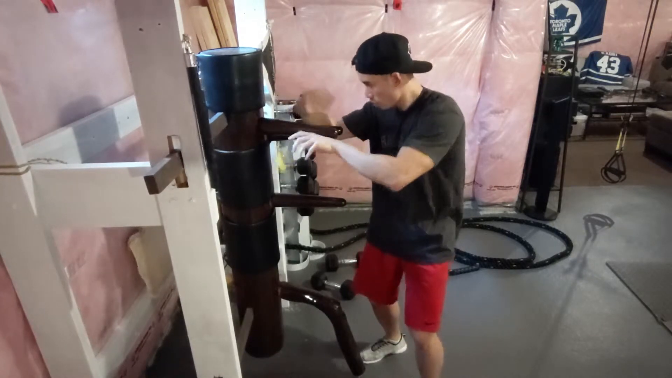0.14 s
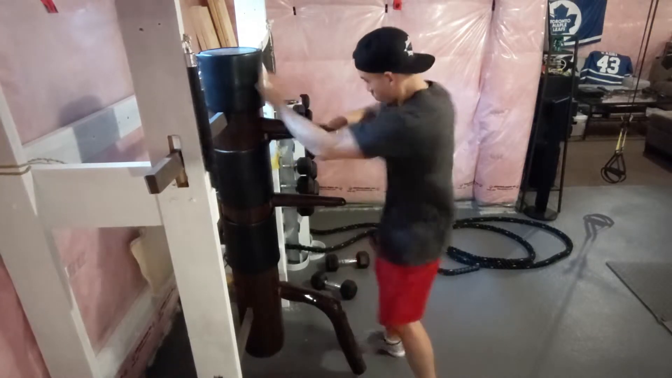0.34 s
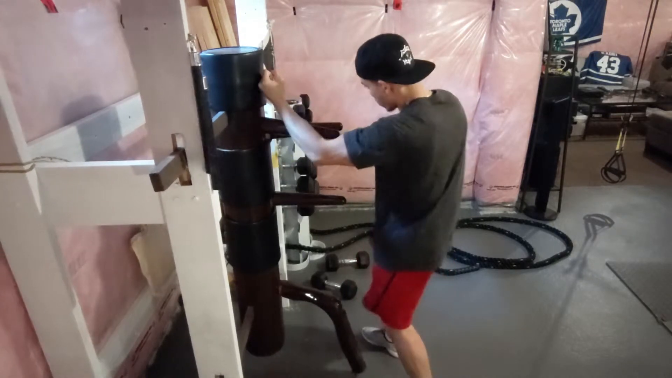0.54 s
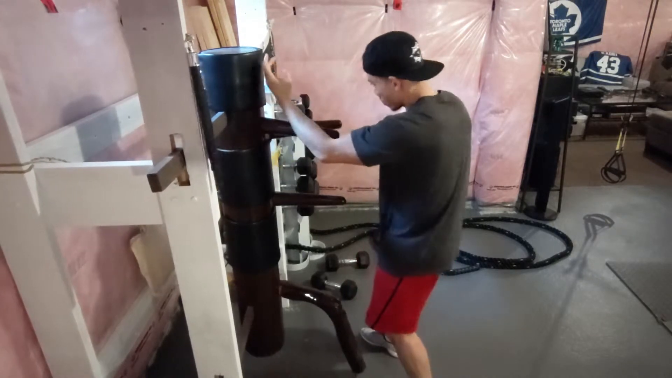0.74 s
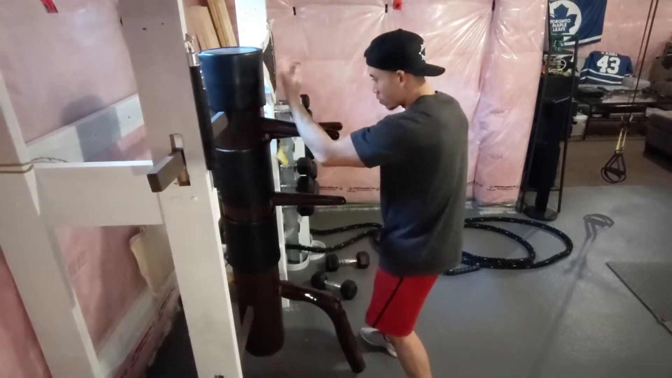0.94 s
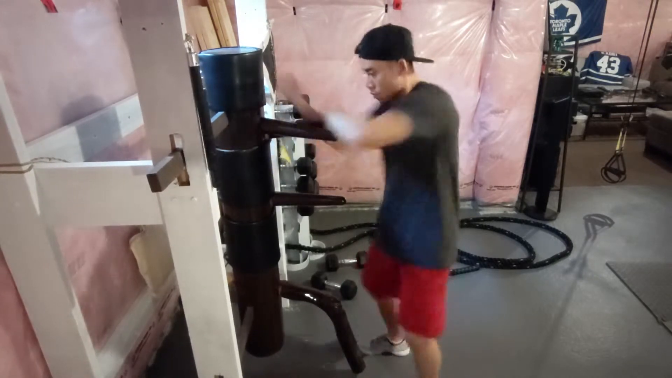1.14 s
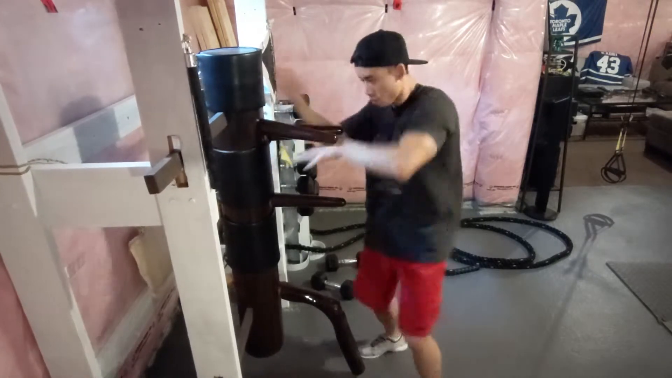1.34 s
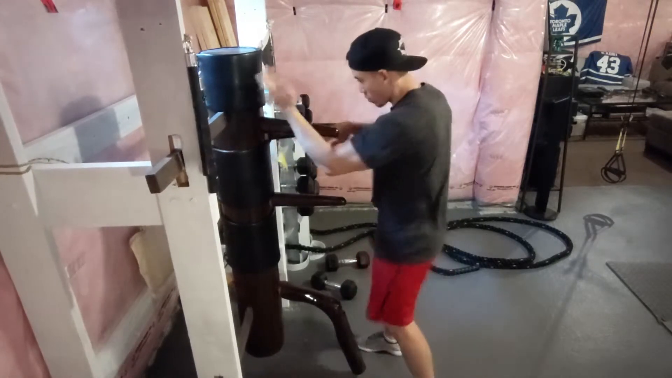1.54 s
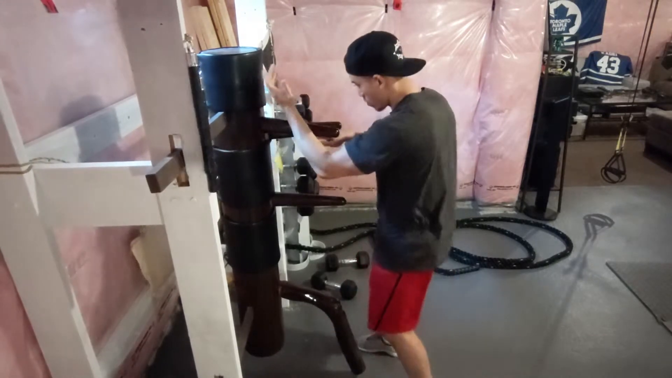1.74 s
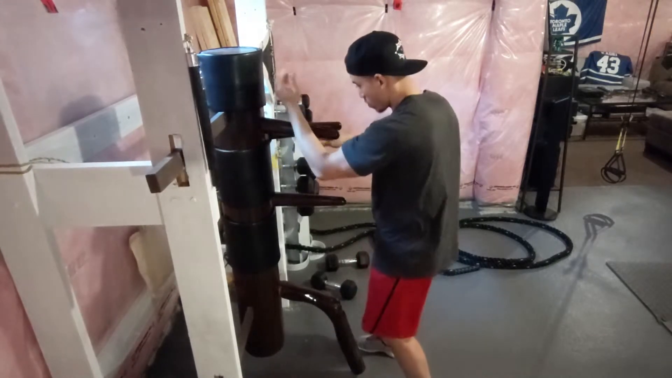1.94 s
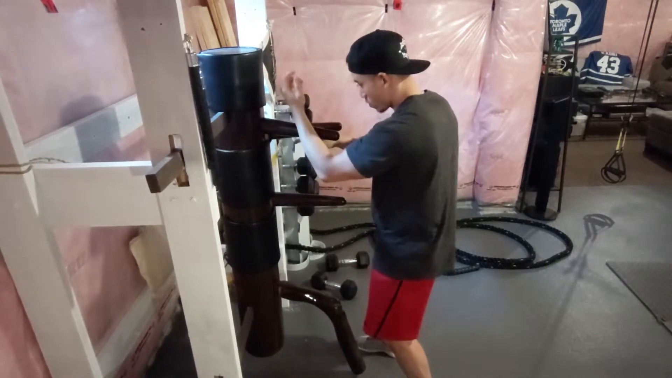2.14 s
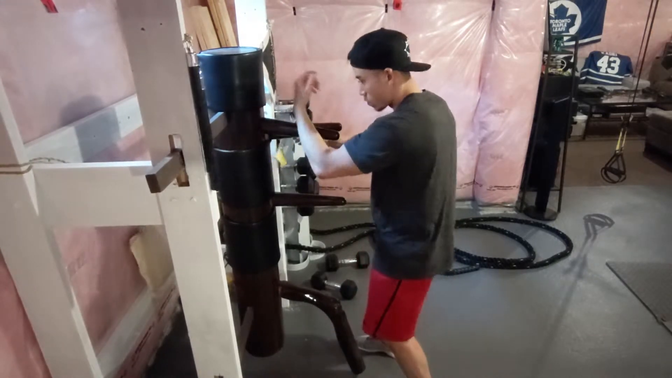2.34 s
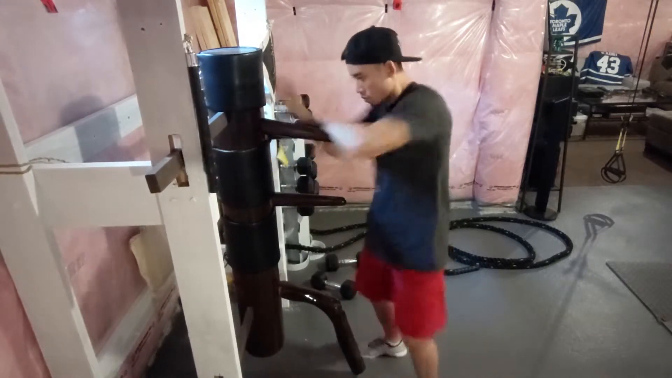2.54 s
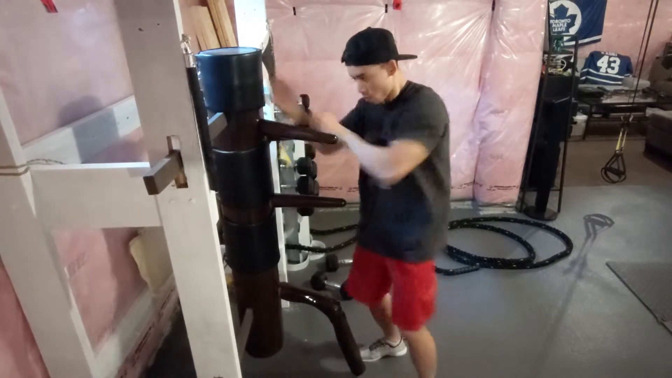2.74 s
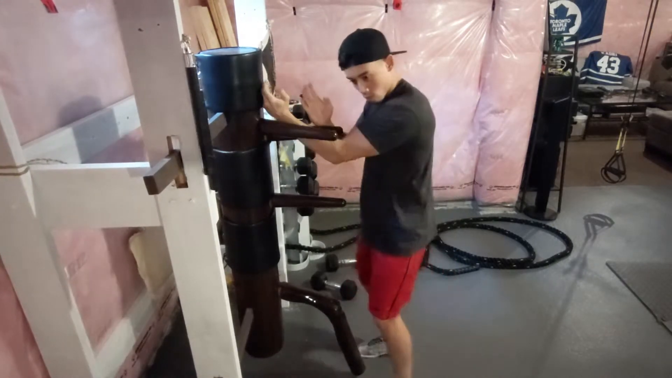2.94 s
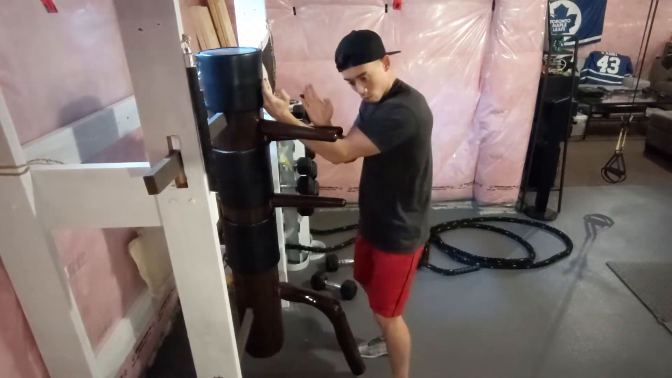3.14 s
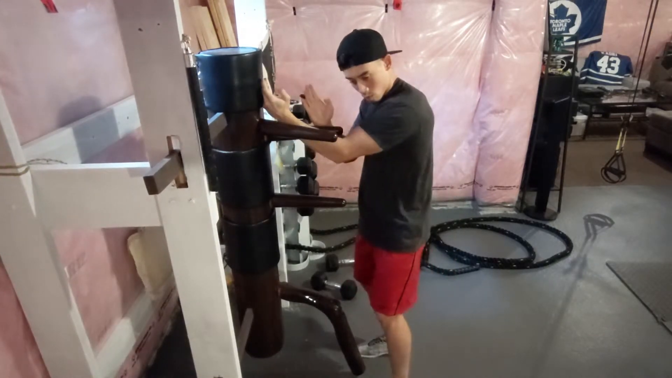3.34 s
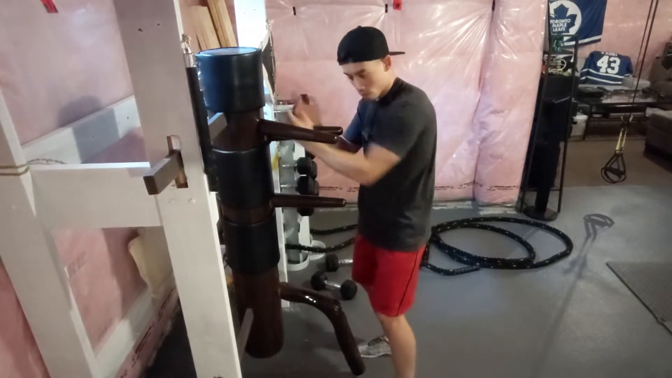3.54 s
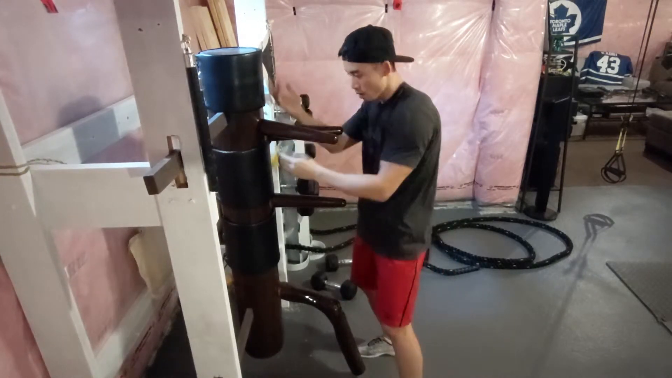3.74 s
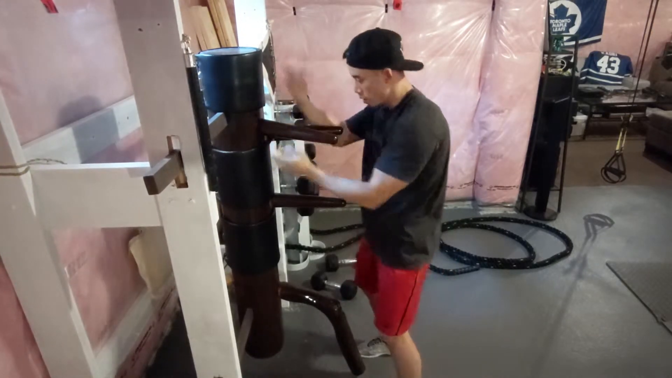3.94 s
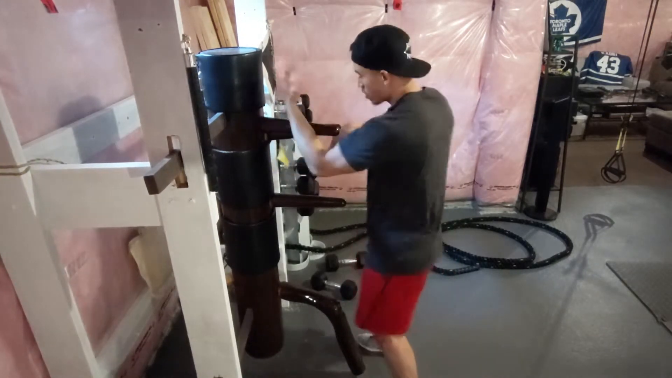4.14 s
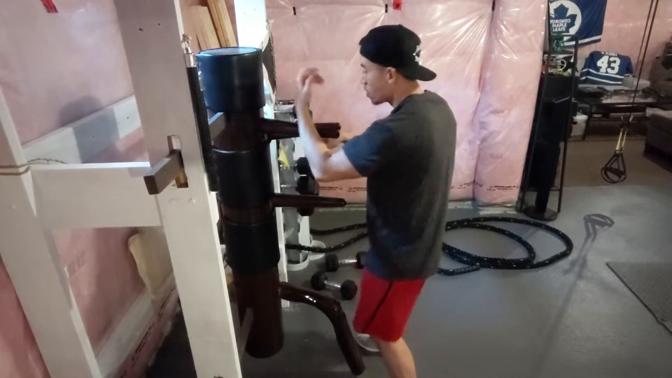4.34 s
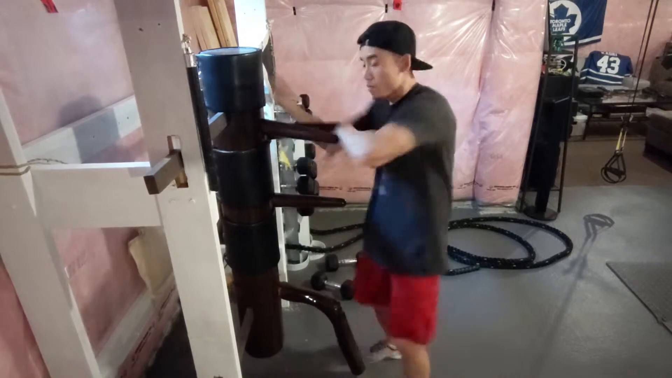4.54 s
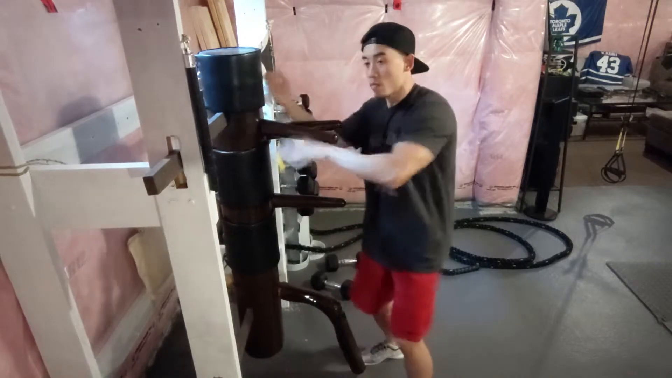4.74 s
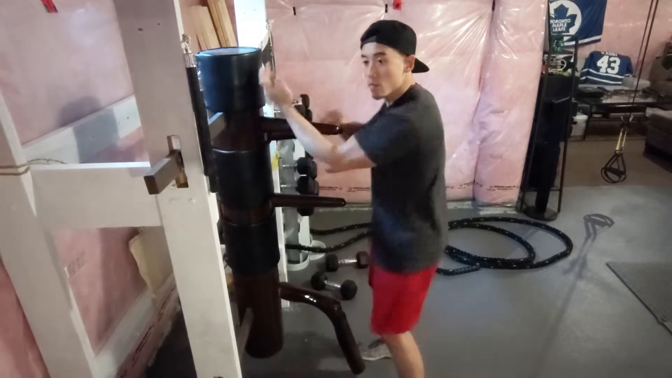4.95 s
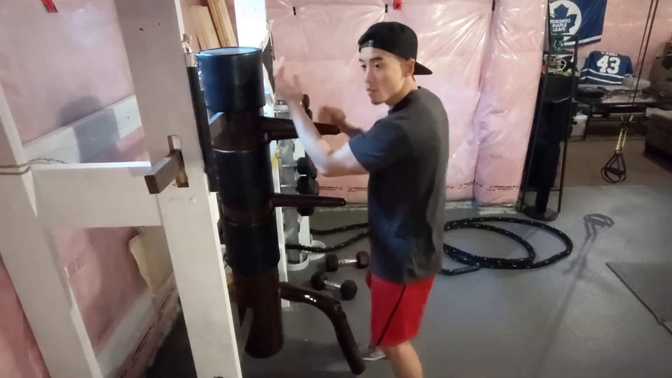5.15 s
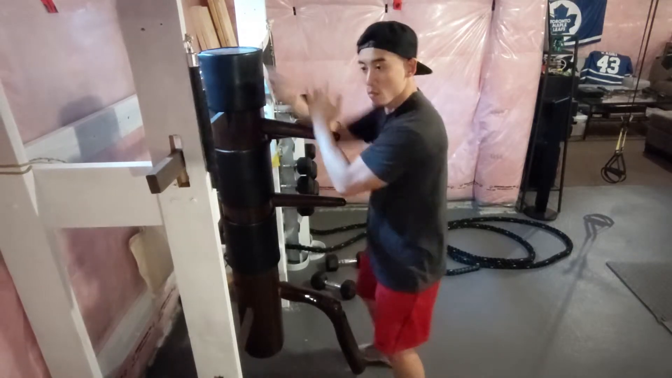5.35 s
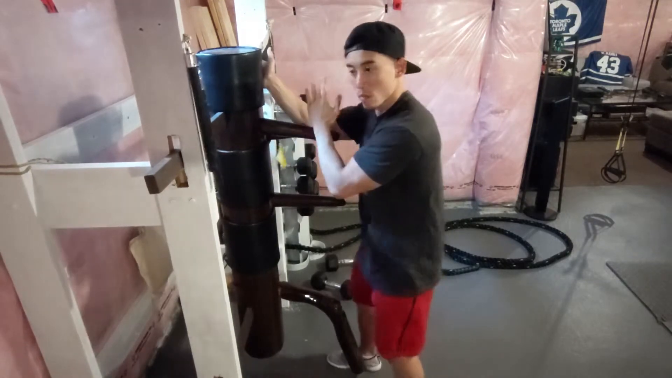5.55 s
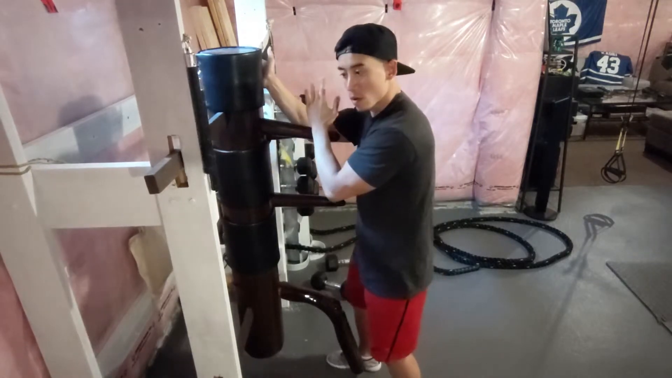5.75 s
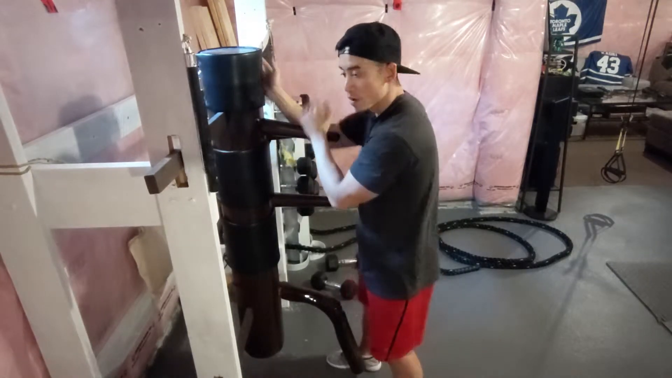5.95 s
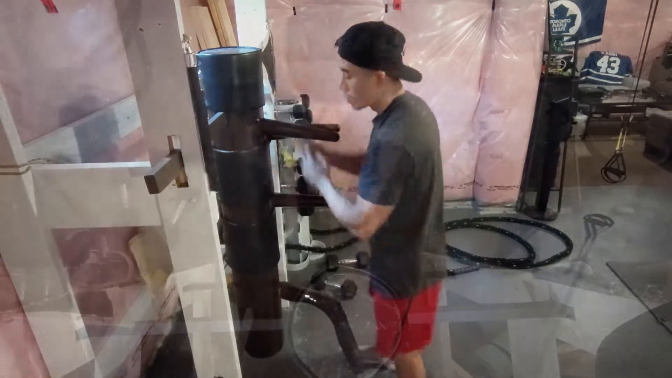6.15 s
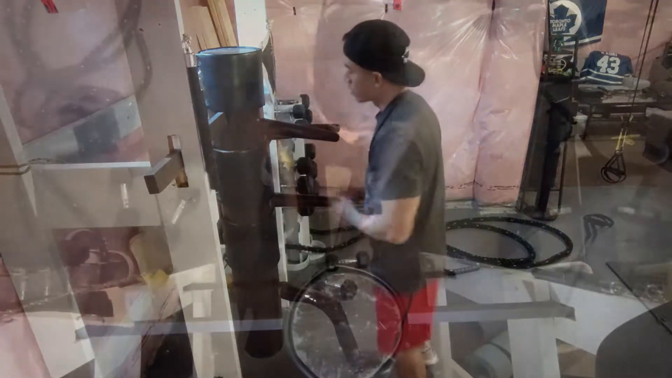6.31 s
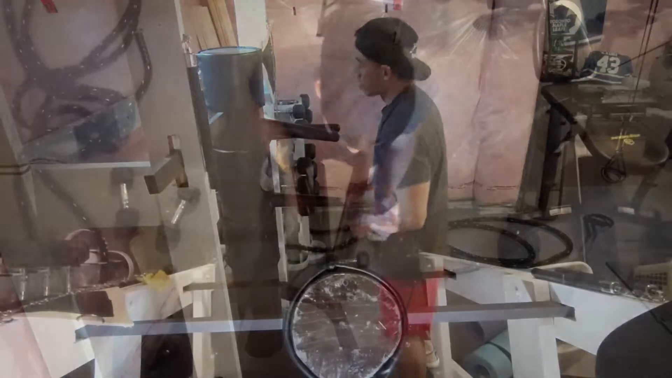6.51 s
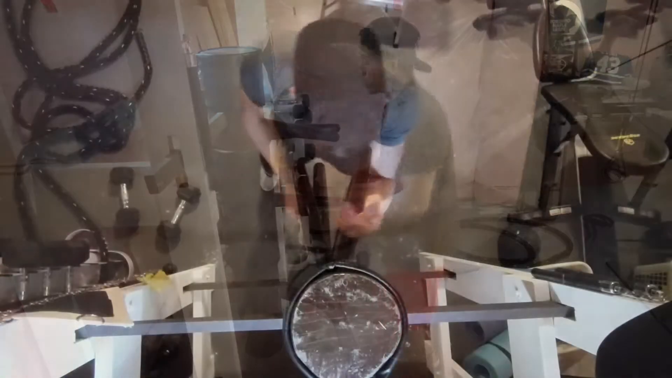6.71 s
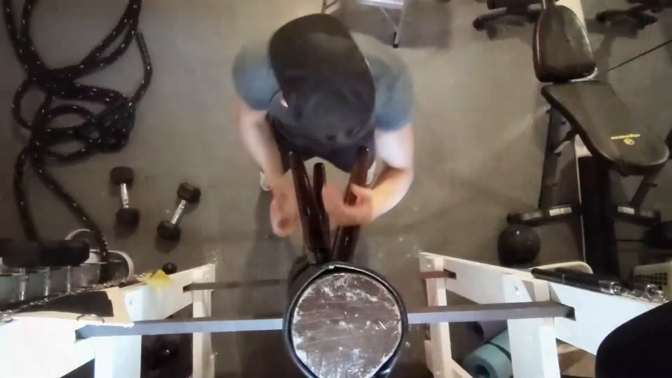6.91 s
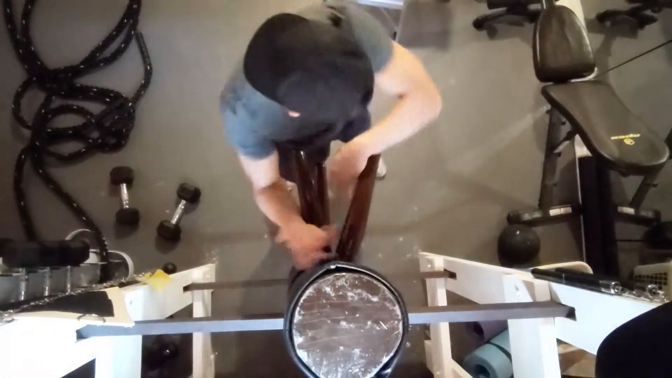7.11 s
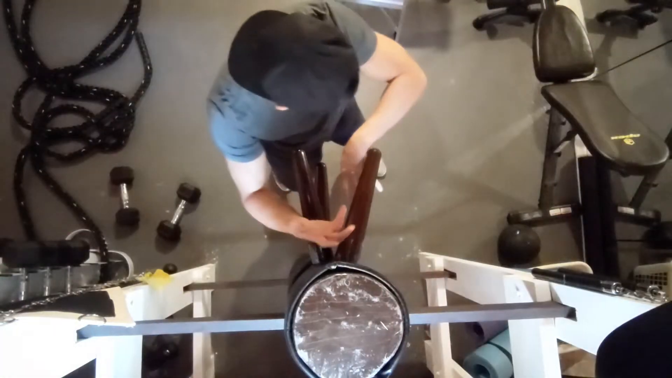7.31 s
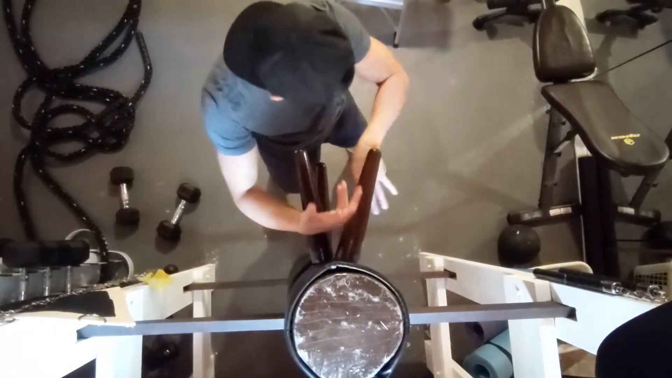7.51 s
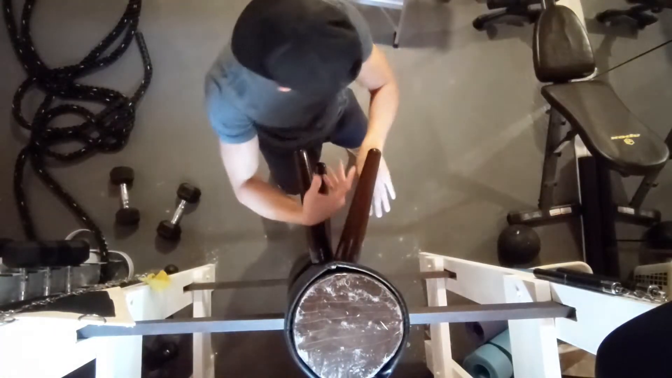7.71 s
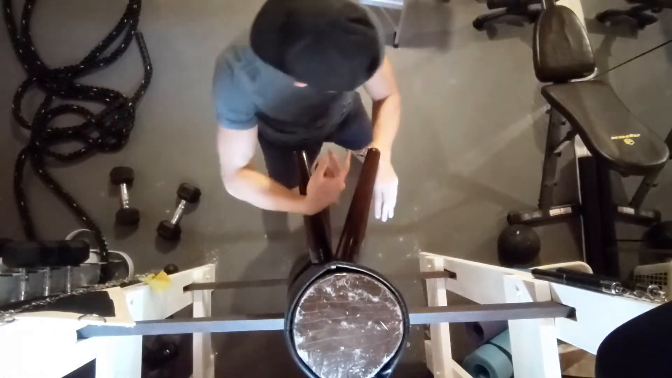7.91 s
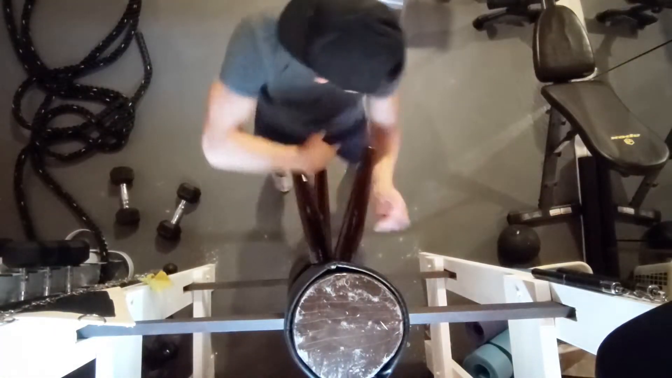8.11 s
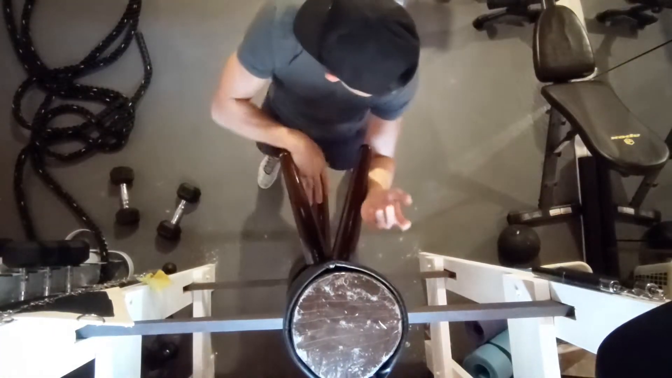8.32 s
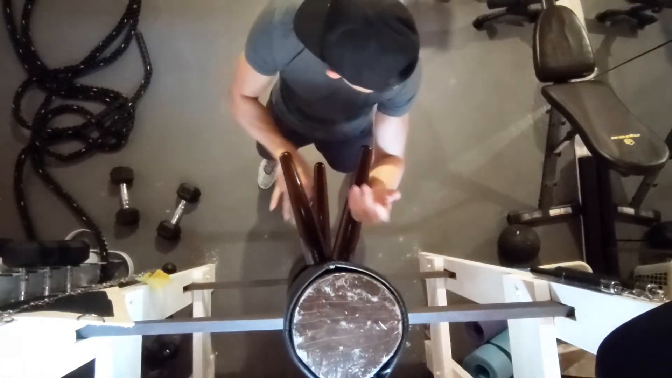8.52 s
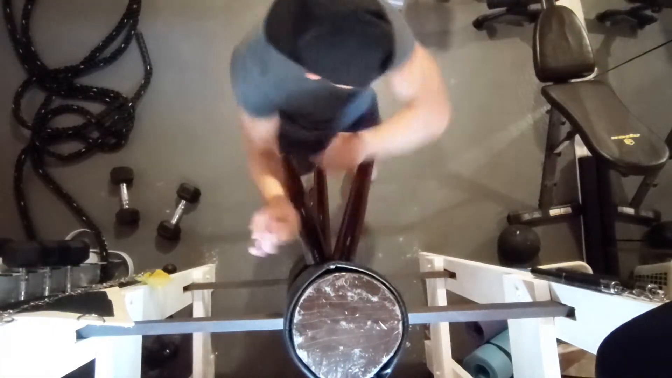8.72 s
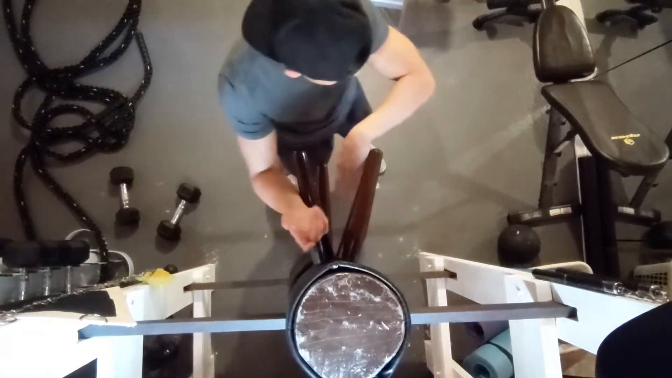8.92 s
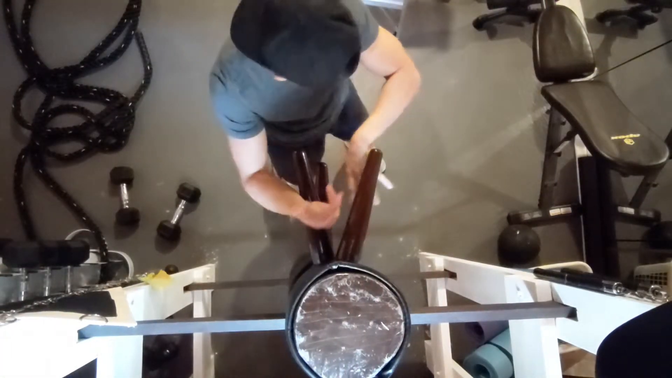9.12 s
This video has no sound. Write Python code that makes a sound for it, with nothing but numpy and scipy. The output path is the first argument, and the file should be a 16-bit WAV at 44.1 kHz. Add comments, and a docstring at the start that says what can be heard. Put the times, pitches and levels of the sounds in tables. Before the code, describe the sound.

Rapid wood knocks and slaps on a training dummy come in flurries, with low trunk thumps, skin slides and faint shoe scuffs in a padded basement.

```python
"""A padded basement gym, small and dry, heard a few metres from its walls through two microphone ports.
Forearms and palms strike a wooden training dummy: contact noise and ringing modes make its loose arms knock
and rattle in their sockets, and low modes thud in trunk and frame. Skin slides on wood and shoes scuff the
floor as coloured noise, over floor rumble and room tone. From 6.6 s the microphone hears from overhead."""
import sys
import numpy as np
from scipy import signal
from scipy.fft import rfft, irfft, next_fast_len
from scipy.io import wavfile
from scipy.ndimage import uniform_filter1d, map_coordinates

SR = 44100
rng = np.random.default_rng(int(sys.argv[2]) if len(sys.argv) > 2 else 0)


def int16_out(signal):
    """Quantize to a 16-bit WAV file."""
    q = np.round(np.clip(np.atleast_2d(signal).T, -1, 1) * 32767)
    wavfile.write(sys.argv[1], SR, q.astype(np.int16))


N = 404397

# Floor rumble, the floor shaken by the dummy's frame, swelling after blows: [t/s, level/dB]
RUMBLE = [(0.0, -49), (0.43, -65.5), (0.69, -43.5), (1.1, -60), (1.71, -42.5), (1.94, -59.5), (2.6, -70.5),
          (2.93, -41), (3.29, -69), (4.98, -50.5), (5.21, -58.5), (5.49, -59.5), (5.67, -42.5), (6.51, -74),
          (7.35, -58), (7.84, -68.5), (8.89, -64.5), (9.17, -47)]
# Room tone, with a dip near 6.8 s: [t/s, level/dB]
ROOM_TONE = [(0, -66.5), (6.4, -64), (6.8, -74.5), (9.17, -66.5)]
# Colour of the room tone: [f/Hz, relative level/dB]
AIR_COLOUR = [(59, -33), (100, -2.5), (761, -20.5), (942, -17.5), (1790, -23), (2260, -23.5), (2460, -25),
              (3400, -24), (7330, -30), (14200, -30.5), (16500, -41)]
# Likeness of the two ports: [f/Hz, left-right correlation]
PORT_LIKENESS = [(60, .99), (180, .94), (500, .72), (1500, .5), (4000, .25), (15000, .2)]
# Decay of the room: [f/Hz, t60/s]
ROOM_DECAY = [(100, 0.74), (300, 0.35), (800, 0.24), (2000, 0.26), (5000, 0.32), (13000, 0.25)]
# Microphone position: [t/s, delay of the left port behind the right/samples]
PORT_LAG = [(0, 4), (6.4, 1), (6.7, -2), (9.17, -2.4)]
# Blows on the dummy: [t/s, strength/dB, hardness/dB, place toward the arm tip/dB, slowest arm bend/dB,
# trunk level/dB, frame level/dB, left over right/dB]
KNOCKS = [(0.38, -40.5, -8, -10, 6, -47.5, -62, 2), (0.416, -19, -1.5, 1.8, -8.5, -36, -50.9, 1.1),
          (0.505, -13.5, 3, -2.5, -4, -32.5, -35.5, 1), (0.513, -30.5, 9, -3.5, -5, -31.5, -35, -1.3),
          (0.539, -14.5, 10.5, 3.3, -13, -26, -30, 1), (0.556, -20, 11.5, 0, 5, -38, -36, -0.5),
          (0.664, -25.5, 3.5, -0.5, 5.5, -46.5, -54, 0.2),
          (0.809, -30.5, -0.8, 1.7, -0.5, -40, -51.4, -0.9), (0.821, -37, -8, 8.5, -6, -40, -60.7, 1.05),
          (0.866, -55, 16.5, 3.2, 7, -59, -64.5, 1), (1.247, -30, -6.5, 2, 4, -51.5, -59, -1.2),
          (1.293, -23.5, 1.5, -0.04, -2, -37, -49, -0.5), (1.308, -15.5, 14.5, 1.05, -4, -38, -51.2, -1.3),
          (1.322, -19, 6, 7.5, -17, -36, -44, 1.5), (1.335, -15.5, -3.5, -5, -23, -35.5, -50.2, -0.3),
          (1.445, -25.5, -1.5, 2.16, -3, -38.5, -59.7, 0.7), (1.46, -13.5, -4, 6, 1.5, -37.5, -58.2, -0.2),
          (1.487, -24, -10.5, 5.1, -22, -50, -39, 0.7), (1.635, -14, 9.5, -5.85, -1, -34.5, -49.5, 0.65),
          (1.795, -37, 8, 1, 6, -49, -51.5, -2), (1.884, -43.5, 12, 2.5, 3, -52.5, -50, -0.7),
          (2.11, -30, -9, -5, -2.5, -45, -58.5, 0.6), (2.121, -43.5, 1.2, 2.5, -6, -50.5, -60.5, 0.6),
          (2.601, -45.5, -4.5, 4, 8, -51.1, -62.8, 0.5), (2.633, -26.5, 8.5, -1.5, -1.4, -45, -60, 1),
          (2.643, -27, 1.4, 4, -3, -44, -58, -1.1), (2.679, -21.5, 6.5, 2.3, -2, -39, -53, 0.2),
          (2.695, -17, -2.5, 2.5, 5, -38.5, -51, 1.5), (2.717, -9.5, 7, 1.46, -13, -44, -41, 0.6),
          (2.871, -20, -10.5, -9, 0.5, -44, -39.8, -0.2), (2.899, -41, -1.5, 14, -1, -55.9, -57, 1.1),
          (2.973, -43, 6.5, 6.5, 2, -41, -57, 1), (3.333, -58.5, 16.5, 0.5, -2, -73, -72.0, 0.4),
          (3.635, -54, 0.5, -10, 9, -47, -56.5, 0), (3.847, -66, 21.5, -2, -7.5, -73.5, -74, 1.0),
          (3.987, -50.5, -5.5, -6, 7, -57.6, -64.5, 0), (4.184, -71, 4.5, -0.5, 9, -57.5, -54.5, -5.5),
          (4.217, -51, 9.5, 7, -11.0, -43.5, -54.5, -0.5), (4.239, -22.5, 4, -5.5, 3, -29.5, -53, 0.75),
          (4.251, -17.5, 4.5, 3.5, 6, -25.5, -50.4, -0.6), (4.283, -36, 4, -9.8, 6, -34, -61.7, 3),
          (4.453, -58.5, 9.5, 0, -11, -60, -56, 0.3), (4.521, -24, -8, -3.5, -5, -42.4, -57, 0.1),
          (4.552, -15.5, -10.5, 1.5, -1.5, -58.2, -63, 0.85), (4.559, -17, -15.5, 14.5, -6, -61, -60, -2),
          (4.662, -34.5, 1.3, -6, -0.6, -47.5, -49, 2.5), (4.681, -23, 5, 4.5, -6, -38, -43.2, 0.5),
          (4.692, -25.5, 4.5, -2.6, 6, -34.5, -41, -1.6), (4.716, -17, 12, 3.5, -5, -34.5, -42, -0.5),
          (4.724, -13, 0.1, -3, -22, -32.5, -46, 1.9), (4.738, -16.5, 4.5, 4.5, -3.5, -43, -40, 1.5),
          (4.874, -38.5, -2.5, -3.5, 6.5, -41, -59.4, 1.4), (4.954, -22, 3.5, 0, 0.5, -51, -53, 0),
          (4.969, -15, -5.5, 3.5, -3, -32, -63.3, 0.4), (5.028, -13.5, -5, -2.5, -8, -30.5, -66.2, -0.0),
          (5.049, -26, 3.5, 1.5, 3, -44, -50.9, 3), (5.075, -33.5, 9, 2.4, -12, -52, -49, -0.35),
          (5.191, -43, 10, 3.5, 6, -57, -65, -1.5), (5.349, -60, 14.5, 2, 1, -61, -71.4, 1),
          (5.428, -42.5, -4.5, -1, 6, -40.5, -57, 0.7), (5.439, -25, -7, -7.5, -2, -37, -57, 1),
          (5.457, -23.5, -2.3, -3.5, -0.5, -40, -54, 1), (5.527, -33.5, 6, -5, -3.3, -53, -46, 0.5),
          (5.552, -26.5, -2.9, 2, 5.5, -26, -40, 2.5), (5.569, -28.5, 14, -5, -2.8, -22, -32.5, 0),
          (5.59, -38.5, 11.5, 5, 5.7, -29.5, -35, -0.64), (5.62, -41.5, 6, 5, -1, -43.9, -49.1, 1),
          (5.672, -33, -7, -1.5, 2.5, -61, -49, 3), (5.847, -56.5, 12.5, -4.5, 5.5, -57.5, -56, 1.6),
          (6.329, -56.5, -3, 1, -0.5, -78, -66, 1.4), (6.433, -60, 12.5, -8, 1, -76, -72.8, 0),
          (6.834, -32, -15, -1.5, 2, -48, -60.5, 2.5), (6.869, -33.5, -14, 1, 7, -51, -58.5, 1.5),
          (7.024, -40.5, -16.5, -4, 7.5, -57, -68, 1.9), (7.053, -51, -23, -16, 4, -69, -71.1, 7),
          (7.163, -47, -8, -6, 10, -48, -60, 1.2), (7.203, -22.5, 0.5, 4, 5.5, -32, -55, -3.1),
          (7.207, -18.5, 1.6, -1, 6.5, -33.5, -60, 2.3), (7.27, -24.5, -9.0, -4, 6, -47, -57, 4.5),
          (7.282, -26.5, -12.6, -7, -4, -47.9, -41.5, 0), (7.545, -29.5, -17, -6, 5, -47, -74, 4.5),
          (7.552, -27, -22, -4, 5, -51, -64, -0.5), (8.211, -58.1, -11, -1.5, 7.5, -63, -72.5, 4),
          (8.254, -26.5, -9, 1, 10.5, -52.5, -70.6, 1.5), (8.288, -22.5, -13.5, 2.5, 7.5, -44, -56, 1.5),
          (8.305, -34, 6, 8, 1.5, -37, -52.5, 0.5), (8.321, -28.5, -7.5, 4.0, 5.8, -36.5, -55.5, 7.5),
          (8.344, -29, 6, 6, 0, -49.5, -53, 0), (8.365, -24.5, -3.1, -4, 5, -47, -54.5, 1.5),
          (8.39, -37, -1, -7, -1, -51, -56.1, -6), (8.578, -46, 4, 0.5, -3, -63, -78.5, 1.4),
          (8.587, -55, -9, -4.5, -8, -56.5, -80, 12), (8.752, -54, 3, -3.5, 9.5, -63.5, -83.5, 1.7),
          (8.809, -44, -10, -5.5, 11, -40, -61.8, 1.9), (8.834, -15.5, -14.5, -1.5, 4.5, -47, -64, 1.8),
          (8.914, -12.5, 0, -3, -1.3, -34, -46, 2), (8.924, -12.5, -1.5, 8.5, -1, -32, -36, 0.8)]
# Colour of a clack: [f/Hz, level/dB, then dB per dB of hardness, of place toward the tip, of slow bend,
# of trunk over strength, and last the change from overhead/dB]
CLACK_COLOUR = [(370, -14.5, 0.4, -0.39, 0.37, 0.16, -7.5), (650, -7, 0, 0.1, 1.2, 0, 0.5),
                (854, -3, 0.5, -0.76, 0, 0, -0.5), (1706, -4, 0.41, 0.84, 0.026, 0, 0),
                (2620, -10.5, 0.71, 0.41, 0, 0, -1.5), (4556, -15.5, 1.13, 0.29, 0.073, 0, -0.5),
                (9900, -23, 1.46, -0.25, 0.067, 0, 0.5)]
# Peaks and valleys that the arm's bending modes leave in the contact noise: [f/Hz, level/dB]
BENDING_GRAIN = [(900, 2.5), (1250, 0.5), (1700, 1.03), (2080, -3), (2550, 6), (3000, 1), (3800, 2.5)]
# Modes of the hardwood arms: [f/Hz, level/dB, t60/s]
ARM_MODES = [(358.5, 4, 0.059), (602.7, -12.5, 0.22), (747, -1.5, 0.033), (869, 5, 0.02), (1130, -5, 0.023),
             (1390, -5.5, 0.045), (1599, -3.5, 0.053), (1711, -7, 0.084), (2415, 2.5, 0.016),
             (2705, -8, 0.028), (3190, -8, 0.043), (3740, -7, 0.046), (4300, -24.5, 0.022),
             (5100, -13, 0.028), (5640, -8, 0.087), (7030, -15, 0.12), (7480, -9, 0.12)]
# Modes of the trunk: [f/Hz, level/dB, t60/s]
TRUNK_MODES = [(108.5, -8.5, .3), (142.16, -4.5, 0.37), (155.5, -1.2, 0.4), (196.6, -4, 0.34),
               (239.7, -5.5, 0.2)]
# Modes of the frame and the slats that carry the trunk: [f/Hz, level/dB, t60/s]
FRAME_MODES = [(27, -9.5, 0.53), (34, -13, .3), (40.56, -7, 0.32), (48.12, -3.5, 0.83), (56.5, -4, 0.15),
               (66, -2.5, 0.12), (77.9, -5, 0.74), (99, -4, 0.25)]
# Forearms sliding along the wood: [t/s of the blow, level/dB]
SLIDES = [(0.539, -45), (1.245, -63.5), (1.305, -38.5), (2.719, -39.5), (4.244, -53.5), (4.52, -59),
          (4.685, -49), (5.57, -35), (7.204, -47), (8.299, -49), (8.913, -41.5)]
# Shoes and shirt in motion: [t/s of the loudest moment, level/dB, rise over 20 dB/s, fade by 20 dB/s]
SCUFFS = [(3.04, -47, .09, .12), (3.135, -51, .09, .1), (3.89, -60, .1, .13), (4.04, -63, .1, .1),
          (5.82, -62, .15, .2), (6.05, -68, .12, .12), (6.23, -62, .13, .1), (6.37, -63, .04, .1),
          (6.445, -60, .09, .13), (6.635, -65, .05, .06)]
# Colour of soles and cloth: [f/Hz, relative level/dB]
SOLE_COLOUR = [(150, -49.5), (250, -11.5), (775, -11.5), (971, -12.5), (1530, -4.5), (1850, -13),
               (2050, -9.5), (5730, -12), (16000, -27.5)]

TOP_HZ = 16300  # upper limit of the microphone's band
SPAN, LEAD = 2 ** 15, 1024  # samples in one knock with its room tail, and those ahead of its onset
OVERHEAD_S = 6.6  # from here on the microphone looks down on the dummy
USUAL_THUD_DB = -14.5  # usual trunk level over strength
CHATTER_S = .0025  # decay constant of the contact
RING_DB, RING_PER_HARD = -1, -.3  # free ring (dB); a hard slap damps the arm (dB per dB)
FRAME_TILT_DB = 6.5  # dB per octave about 50 Hz: from overhead the frame sounds higher
BUILD_UP_S, LET_GO_S = 0.029, 0.042  # time constants of a slide before and after its blow
LEFT_RIGHT = np.array([[1], [-1]])  # opposite signs for the two ports


def amp(db):
    """Gain of a level in dB."""
    return 10 ** (np.asarray(db) / 20)


def unit(x):
    """x at rms 1."""
    return x / np.sqrt(np.mean(x ** 2) + 1e-20)


def along(points, hz):
    """(Hz, value) points read on a log frequency axis."""
    f, v = np.transpose(points)
    return np.interp(np.log(hz + 1), np.log(f + 1), v)


def curve(rows, count):
    """Column number count of a time table, one value per sample."""
    columns = np.transpose(rows)
    return np.interp(np.arange(N) / SR, columns[0], columns[count])


def wobble(rate):
    """A smooth random curve with rate knots a second."""
    knots = rng.standard_normal(int(N * rate / SR) + 4)
    return map_coordinates(knots, [np.arange(N) * rate / SR])


def two_ports(pair, spectrum):
    """Two unrelated signals, coloured and mixed so that the ports agree most in the bass."""
    size = pair.shape[-1]
    hz = np.fft.rfftfreq(size, 1 / SR)
    turn = np.arccos(np.clip(along(PORT_LIKENESS, hz), -1, 1)) / 2
    coloured = rfft(pair) * amp(along(spectrum, hz))
    mid, side = irfft(coloured * [np.cos(turn), np.sin(turn)], size)
    return np.array([mid + side, mid - side])


def rush(spectrum):
    """Coloured stereo noise of rms 1."""
    noise = rng.standard_normal((2, next_fast_len(N)))
    return unit(two_ports(noise, spectrum)[:, :N])


def basement():
    """Unsteady low rumble of the shaken floor, low-passed noise, over a faint room tone."""
    low = rush([(15, -19.0), (28, 0.0), (48, -1.0), (70, -17), (110, -27.5), (300, -87.0)])
    rumble = amp(curve(RUMBLE, count=1) + 1.1 * wobble(6.7)) * low
    room_tone = amp(curve(ROOM_TONE, count=1) + 0.73 * wobble(3.3)) * rush(AIR_COLOUR)
    return rumble + room_tone


def ring(modes, level_db, rise, scatter_db, drift):
    """Struck modes decay as sines; every blow finds new strengths and slightly other pitches."""
    hz, db, t60 = np.transpose(modes)[:, :, None]
    t = np.arange(SR // 2) / SR
    chance = rng.standard_normal((2, len(modes), 1))
    db = db + level_db + scatter_db * chance[0] - 60 * t / t60
    phase = 2 * np.pi * hz * (1 + drift * chance[1]) * t
    return np.sum(amp(db) * np.sin(phase), axis=0) * (1 - np.exp(-t / rise))


def room_answer(wet_db):
    """Direct sound, then a tail of decaying noise in which each frequency dies at its own speed."""
    size = SPAN // 2
    hz, t, z = signal.stft(rng.standard_normal((2, size)), SR, nperseg=256)
    early = amp(-2 - 60 * t / 0.044)  # floor, post and nearest wall
    late = amp(-28 - 60 * t / .75)  # the rest of the basement lingers faintly
    body = amp(-60 * t / along(ROOM_DECAY, hz)[:, None])
    tail = signal.istft(z * (body + early + late), SR, nperseg=256)[1][:, :size]
    tail *= 1 - np.exp(-np.arange(size) / (0.0018 * SR))  # the first walls are a few metres away
    tail = two_ports(tail, [(100, -4.5), (1000, -3.0), (12000, -2.0)])
    tail *= amp(wet_db) / np.linalg.norm(tail[0])
    tail[:, 0] = 1  # direct sound
    return tail


def clack(colour_db, hard_db):
    """Spectrum of one arm knock: a noisy chatter of wood on wood plus the arm modes it sets ringing."""
    t = np.arange(SPAN // 8) / SR
    hz = np.fft.rfftfreq(SPAN, 1 / SR)
    colour = list(zip(np.transpose(CLACK_COLOUR)[0], colour_db))
    arm_hz = np.array(ARM_MODES)[:, :1]
    ring_db = along(colour, arm_hz) + RING_DB + RING_PER_HARD * hard_db
    arms = ring(ARM_MODES, ring_db, CHATTER_S / 2, scatter_db=4.5, drift=.008)
    contact = rng.standard_normal(len(t)) * np.sqrt(t) * np.exp(-t / CHATTER_S)
    edges = [(120, colour_db[0] - 24.5)] + colour + [(16000, colour_db[-1] - 7.5)]
    gain = amp(along(edges, hz) + along(BENDING_GRAIN, hz) + 34.5)
    gain *= np.sqrt(900 / (hz + 1))  # falls 3 dB per octave
    crack = rfft(contact / np.linalg.norm(contact), SPAN) * gain
    return rfft(arms, SPAN) + crack


def trunk_and_frame(thud_db, frame_db, overhead):
    """Low modes of the heavy wood and what carries it, slow to give way."""
    tilt_db = FRAME_TILT_DB * np.log2(np.array(FRAME_MODES)[:, :1] / 50)
    trunk = ring(TRUNK_MODES, thud_db, 0.0089, scatter_db=4.5, drift=0.033)
    frame = ring(FRAME_MODES, frame_db + overhead * tilt_db, .008, scatter_db=6.5, drift=0.066)
    return trunk + frame


def dummy():
    """Each blow cracks and rings the arms within the room; trunk and frame thud under it, without room."""
    out = np.zeros((2, N + SPAN))
    hz = np.fft.rfftfreq(SPAN, 1 / SR)
    lag = curve(PORT_LAG, count=1)
    _, usual_db, *slopes = np.transpose(CLACK_COLOUR)
    for s, db, hard_db, place_db, bend_db, thud_db, frame_db, pan_db in KNOCKS:
        at = round(s * SR)
        overhead = s > OVERHEAD_S
        extra_thud_db = thud_db - db - USUAL_THUD_DB
        traits = [hard_db, place_db, bend_db, extra_thud_db, overhead]
        colour_db = db + usual_db + np.dot(traits, slopes)
        delay = LEAD + lag[at] / 2 * LEFT_RIGHT  # samples
        ports = amp(pan_db / 2 * LEFT_RIGHT) * np.exp(-2j * np.pi * hz / SR * delay)
        room = rfft(room_answer(wet_db=6.5), SPAN)
        heard = irfft(clack(colour_db, hard_db) * room * ports, SPAN)
        heard[:, :LEAD] *= np.linspace(0, 1, LEAD) ** 2  # soften what wraps round ahead of the knock
        thud = trunk_and_frame(thud_db, frame_db, overhead)
        heard[:, LEAD:LEAD + len(thud)] += thud * amp(0.46 * pan_db * LEFT_RIGHT)
        out[:, at - LEAD:at - LEAD + SPAN] += heard
    return out[:, :N]


def slides():
    """Skin rubs on wood as a hiss that swells up to the blow, then dies away."""
    t = np.arange(N) / SR
    level = np.zeros(N)
    for s, db in SLIDES:
        level += amp(db) * np.exp(-np.abs(t - s) / np.where(t < s, BUILD_UP_S, LET_GO_S))
    return level * rush([(300, -29.0), (1000, 0.5), (4000, -0.1), (9000, -9.5), (16000, -10.5)])


def shoes():
    """Rubber soles drag and cloth rustles in a grainy, patchy hiss that swells and fades."""
    t = np.arange(N) / SR
    level = np.zeros(N)
    for s, db, swell, fade in SCUFFS:
        level += amp(db - 20 * ((t - s) / np.where(t < s, swell, fade)) ** 2)
    z = signal.stft(rush(SOLE_COLOUR), nperseg=512)[2]
    patches = uniform_filter1d(rng.standard_normal(z.shape[1:]), size=5, axis=0)  # across frequency
    patches = uniform_filter1d(patches, size=12, axis=1)  # across time
    hiss = signal.istft(z * amp(3 * unit(patches)), nperseg=512)[1][:, :N]
    return level * amp(2.4 * wobble(91)) * unit(hiss)


def scene():
    """Everything that reaches the two microphone ports."""
    return basement() + dummy() + slides() + shoes()


def record(dry):
    """The microphone rounds off the highest peaks and keeps nothing above its band limit."""
    soft = dry / (1 + np.abs(dry / .8) ** 3) ** (1 / 3)
    size = next_fast_len(N + SR // 2)
    in_band = np.fft.rfftfreq(size, 1 / SR) < TOP_HZ
    return irfft(rfft(soft, size) * in_band, size)[:, :N]


dry = scene()
out = record(dry)
int16_out(out)
```